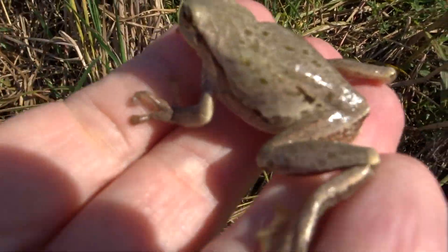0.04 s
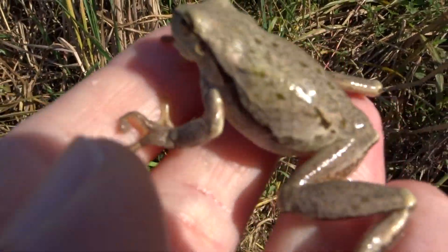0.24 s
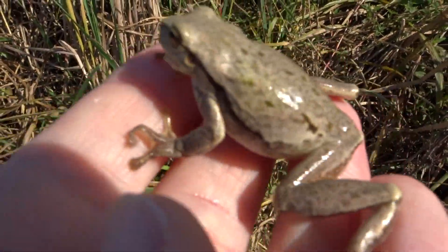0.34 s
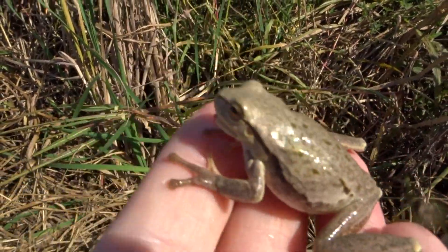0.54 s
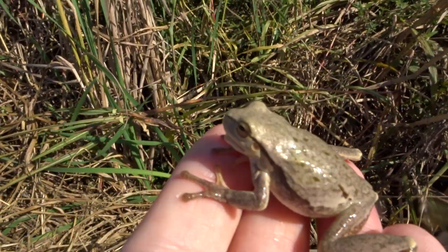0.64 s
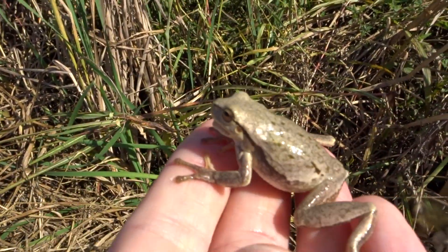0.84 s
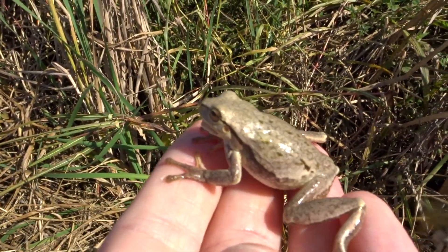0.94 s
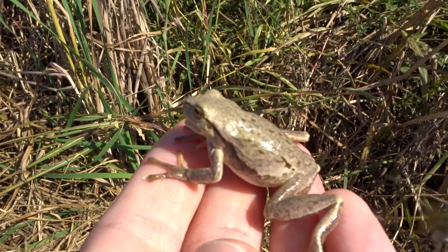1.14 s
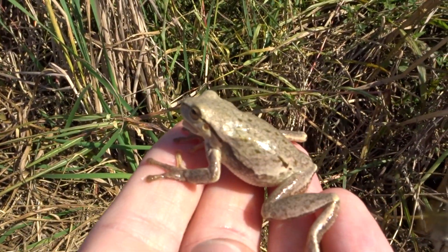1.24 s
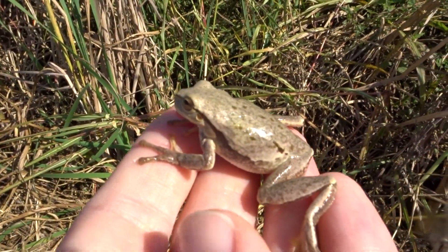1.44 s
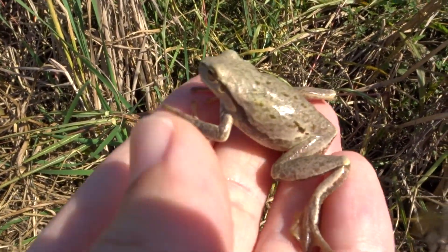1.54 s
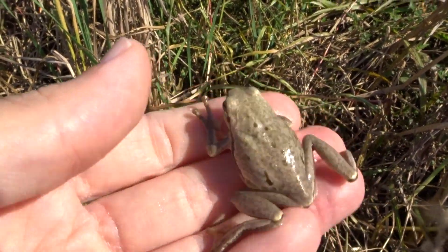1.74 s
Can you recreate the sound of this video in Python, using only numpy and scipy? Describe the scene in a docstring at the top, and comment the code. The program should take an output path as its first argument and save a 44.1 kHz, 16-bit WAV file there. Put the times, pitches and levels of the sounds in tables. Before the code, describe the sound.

One shrill, raspy frog cry rises quickly, then wavers and falls, close by outdoors.

```python
"""A faint outdoor background and a small wet tick, then one long rasping cry from a hand-held tree frog.
Its larynx snaps out clicks that ring in the opening mouth, close to the listener: they speed up
to a scream, sag, waver and end as a rattle. A few soft handling bumps fall early in the cry,
a fine hiss swells under its second half, and one more wet tick follows it."""
import sys
import numpy as np
from scipy import signal
from scipy.fft import rfft, irfft
from scipy.io import wavfile

SR = 44100
rng = np.random.default_rng(int(sys.argv[2]) if len(sys.argv) > 2 else 0)


def generate_wav(sig):
    """Save sig (samples, or channels by samples) to the path in sys.argv[1] as 16-bit PCM at SR."""
    pcm = np.round(np.clip(np.atleast_2d(sig).T, -1, 1) * 32767).astype(np.int16)
    wavfile.write(sys.argv[1], SR, pcm)


N = 79380


def amp(db):
    """Decibels to gain."""
    return 10 ** (np.asarray(db) / 20)


def evened(x):
    """Scales to an rms of 1."""
    return x / np.sqrt(np.mean(x ** 2) + 1e-20)


def curve(points, at, axis=1):
    """Reads one column of a table along straight lines."""
    table = np.transpose(points)
    return np.interp(at, table[0], table[axis])


def colour(points, hz):
    """Reads a spectrum on a log-frequency axis."""
    f, value = np.transpose(points)
    return np.interp(np.log(hz + 1), np.log(f), value)


def add(mix, s, sound):
    """Mixes a sound in at a time."""
    part = mix[round(s * SR):][:len(sound)]
    part += sound[:len(part)]


def slow_noise(hz):
    """Low-passed noise of rms 1."""
    return evened(signal.sosfilt(signal.butter(2, hz, fs=SR, output="sos"), rng.standard_normal(N)))


def causal(db):
    """Spectra that ring after the strike, from rows of levels."""
    cepstrum = irfft(np.log(amp(db)))
    half = cepstrum.shape[-1] // 2
    cepstrum[..., 1:half] *= 2
    cepstrum[..., half + 1:] = 0
    return np.exp(rfft(cepstrum))


# Stereo image of the noise beds. Each row: frequency in Hz, likeness from 0 (wide) to 1 (mono).
LIKENESS = [(50, 1), (200, 0.9), (700, 0.58), (2000, 0.68), (6000, 0.02), (14000, 0.27)]

def noise_bed(eq):
    """Steady noise, centred in the bass and wide in the treble."""
    hz = np.fft.rfftfreq(N, 1 / SR)
    left, other = rfft(rng.standard_normal((2, N)))
    likeness = colour(LIKENESS, hz)
    right = likeness * left + np.sqrt(1 - likeness ** 2) * other
    return evened(irfft(np.array([left, right]) * amp(colour(eq, hz)), N))


# Tone of the outdoor bed. Each row: frequency in Hz, relative level in dB.
OUTDOOR_EQ = [(15, -30), (25, -3.5), (101, -2.5), (164, -8), (1080, -8), (1620, -12), (5010, -12),
              (15500, -32)]

def outdoors(level_db=-50.5):
    """A faint, even wash of outdoor noise."""
    return amp(level_db) * noise_bed(OUTDOOR_EQ)


# Tone of the hiss. Each row: frequency in Hz, relative level in dB.
HISS_EQ = [(800, -13.5), (2500, 1), (5000, 1), (9000, -0.5), (11000, -4), (15500, -5)]
# Its fader ride. Each row: time in seconds, level in dB.
HISS_FADER = [(0, -60), (.18, -56.5), (.3, -66), (.8, -45.5), (1.3, -41), (1.4, -45.5), (1.6, -46),
              (1.8, -51.5)]

def hiss():
    """Fine hiss, a touch to the right, that peaks as the cry ends."""
    fader = amp(curve(HISS_FADER, np.arange(N) / SR))
    return fader * noise_bed(HISS_EQ) * amp([[-.5], [.5]])


# Each row: start in seconds, length in seconds, whistle pitch in Hz, whistle and knock levels in dB.
WET_TICKS = [(0.101, 0.028, 3406, -35.5, -29), (1.6203, 0.0072, 3580, -29, -35.5)]

def wet_ticks(sag=.15, rise_s=.00061, knock_hz=1780, knock_t60=.02):
    """Each tick is a short knock and a tiny falling whistle."""
    out = np.zeros(N)
    for start, length, hz, whistle_db, knock_db in WET_TICKS:
        t = np.arange(0, length, 1 / SR)
        cycles = np.cumsum(hz * (1 - sag * t / length)) / SR
        whistle = np.minimum(t / rise_s, 1) * np.sqrt(1 - t / length) * np.sin(2 * np.pi * cycles)
        knock = np.exp(-np.log(1000) * t / knock_t60) * np.sin(2 * np.pi * knock_hz * t)
        add(out, start, amp(whistle_db) * whistle + amp(knock_db) * knock)
    return out


# Pitch line of the cry. Each row: time in seconds, click rate in Hz.
CLICK_RATE = [(.195, 348), (.201, 830), (.207, 1071), (.217, 924), (.227, 1019), (.235, 1369), (.251, 1818),
              (.273, 2080), (.305, 2044), (.329, 2087), (.353, 2158), (.379, 2075), (.419, 2065),
              (.469, 1955), (.489, 1936), (.517, 1949), (.551, 1917), (.577, 1955), (.593, 1894),
              (.615, 1911), (.639, 1803), (.665, 1840), (.695, 1758), (.721, 1775), (.737, 1644),
              (.765, 1615), (.773, 1471), (.785, 1559), (.792, 1494), (.802, 1587), (.821, 1636),
              (.833, 1536), (.844, 1579), (.856, 1481), (.866, 1464), (.875, 1358), (.883, 1147),
              (.891, 1386), (.901, 1219), (.909, 1429), (.921, 1310), (.933, 1332), (.941, 1170),
              (.961, 1240), (.969, 1395), (.979, 1426), (.989, 1296), (1.001, 1345), (1.012, 1258),
              (1.019, 1346), (1.045, 1332), (1.051, 1171), (1.057, 1282), (1.063, 1288), (1.089, 1027),
              (1.103, 1079), (1.139, 792.4), (1.149, 950), (1.171, 906), (1.179, 804), (1.209, 934),
              (1.225, 842.7), (1.235, 716.7), (1.253, 682.7), (1.267, 773.3), (1.279, 662.6),
              (1.299, 384.7), (1.314, 182.4), (1.325, 95.5), (1.3413, 25.47)]
# Rasp in the voice. Each row: time in seconds, roughness from 0 to 1.
RASP = [(.2, 0.4), (.26, 0.48), (.29, 0.02), (.45, 0.12), (.8, 0.12), (.88, 0.33), (1.1, 0.5), (1.3, 0.3)]

def larynx(quiver=.004, rasp_quiver=.016, quiver_hz=85):
    """Click times, one per cycle of the larynx; the pitch quivers more where the voice rasps."""
    t = np.arange(CLICK_RATE[0][0], CLICK_RATE[-1][0], 1 / SR)
    wobble = (quiver + rasp_quiver * curve(RASP, t)) * slow_noise(quiver_hz)[:len(t)]
    cycles = np.cumsum(curve(CLICK_RATE, t) * (1 + wobble)) / SR
    # The last click lands right at the end of the pitch line.
    return np.interp(np.arange(cycles[-1] % 1, cycles[-1] + .5), cycles, t)


# Force behind the clicks. Each row: time in seconds, gain in dB.
CLICK_FORCE = [(.195, -13), (.1995, -24), (.201, -5), (.206, 2.5), (.238, 2.5), (.253, 1), (.268, 1),
               (.3, 0.5), (.355, 3), (.4, 0.5), (.47, 1), (.7, 0), (.745, -1.5), (.79, 0), (.85, -1),
               (1.0, 0), (1.28, -1), (1.315, -2), (1.342, -4.5)]
# Steady colour of the throat. Each row: frequency in Hz, gain in dB.
THROAT_EQ = [(500, -60), (900, -45), (1300, -27), (1600, -23.5), (1980, -10), (2400, -13), (2900, -7),
             (4000, -6), (4600, -12), (5600, -9), (6400, -12.5), (7500, -12), (10500, -12), (12200, -11),
             (13500, -15), (15000, -24), (16000, -38)]
# Sweep of the mouth's main resonance. Each row: time in seconds, centre in Hz.
MOUTH_SWEEP = [(.2, 3760), (.207, 6400), (.215, 7900), (.235, 7820), (.247, 6850), (.268, 8040),
               (.295, 9470), (.325, 8600), (.353, 9060), (.372, 9720), (.41, 9650), (.435, 9040),
               (.48, 9350), (.6, 9040), (.7, 9050), (.85, 9320), (1.34, 9700)]
# Shape of that peak. Each row: frequency as a multiple of the centre, gain in dB.
MOUTH_PEAK = [(.6, -0.5), (.72, 3), (.81, 6), (.9, 14.5), (1.0, 19.5), (1.06, 14.5), (1.12, 3.5),
              (1.25, -1)]
# A high shelf that makes the top flicker. Each row: time in seconds, gain in dB.
TREBLE_SHELF = [(.2, -24), (.22, -3), (.25, -2.5), (.29, 8.5), (.34, -1.5), (.38, 8.5), (.435, 4.5),
                (.47, 4.5), (.54, 0.5), (.6, 8), (.66, 2), (.8, 0), (1.1, -3), (1.3, -4.5)]
# Stereo image of the cry. Each row: frequency in Hz, left over right in dB, left lead in radians.
CRY_IMAGE = [(1520, -0.5, 0.5), (3030, -2, -0.48), (4700, -1.5, -0.7), (5370, 5, 0.66), (7800, 6, 0.56),
             (8000, 3.5, -0.5), (9350, 0.5, -0.9), (10050, -14.5, -2.2), (10300, -14, 1.07),
             (11340, 16.5, 1), (12570, 2.5, -1.15), (14700, -2.5, 0.8)]
# The cry's bright peak drifts between left and right.
# Each row: time in seconds, extra left over right in dB.
PEAK_PAN = [(.2, -7.5), (.33, 4.5), (.42, 10), (.48, -7), (.6, -10), (.68, -1), (.8, -0.5), (1.3, 2.5)]

def frog_cry(jitter_s=1e-5, shimmer_db=1, breath_db=-12, shelf_hz=(8830, 10500)):
    """Each larynx click rings the throat and moving mouth; rasp adds unevenness and a rush of air."""
    size, lead_in = 256, 24  # samples
    times, hz = larynx(), np.fft.rfftfreq(size, 1 / SR)
    chance = rng.standard_normal((N // lead_in, 2 + 2 * len(hz)))[:len(times)]
    rasp = curve(RASP, times)
    times = times + jitter_s * rasp * chance[:, 0]
    force_db = curve(CLICK_FORCE, times) + shimmer_db * rasp * chance[:, 1]
    mouth_db = curve(MOUTH_PEAK, hz / curve(MOUTH_SWEEP, times)[:, None])
    shelf_db = curve(TREBLE_SHELF, times)[:, None] * np.interp(hz, shelf_hz, [0, 1])
    clicks = causal(colour(THROAT_EQ, hz) + mouth_db + shelf_db + force_db[:, None])
    real, imaginary = np.split(chance[:, 2:], 2, axis=1)
    clicks *= 1 + amp(breath_db) * rasp[:, None] * (real + 1j * imaginary)
    # A phase ramp places each click between samples, keeping the scream's pitch clean.
    starts = (times * SR).astype(int) - lead_in
    clicks *= np.exp(-2j * np.pi * hz * (times - starts / SR)[:, None])
    slots = (starts[:, None] + np.arange(size)).ravel()
    drift_db = curve(PEAK_PAN, times)[:, None] * mouth_db / mouth_db.max()
    balance_db = curve(CRY_IMAGE, hz) + drift_db
    left_lead = curve(CRY_IMAGE, hz, axis=2)
    channels = []
    for side in (1, -1):  # left, right
        pan = np.sqrt(2 / (1 + amp(-side * balance_db) ** 2))
        grains = irfft(clicks * pan * np.exp(.5j * side * left_lead))
        channels.append(np.bincount(slots, grains.ravel(), N)[:N])
    return np.array(channels)


# Finger nudges. Each row: start in seconds, gain in dB, tilt of the ring in dB per octave.
NUDGES = [(.2693, -37, 5), (.2728, -30.5, -0.5), (.3485, -46.5, 5)]
# Modes of the camera body. Each row: frequency in Hz, relative level in dB.
BODY_MODES = [(150, -4), (400, 3.5), (640, -4), (850, -7.5), (980, 0), (3000, -16)]

def handling_bumps(rise_s=.0012, t60=.039, thud_db=-6, thud_hz=1240, pivot_hz=400):
    """Fingers nudge the camera: a dull thud with a brief ring, slightly to the right."""
    out, t = np.zeros(N), np.arange(2500) / SR
    envelope = np.minimum(t / rise_s, 1) * np.exp(-np.log(1000) * np.maximum(t - rise_s, 0) / t60)
    for start, gain_db, tilt_db in NUDGES:
        ring = sum(amp(db + tilt_db * np.log2(hz / pivot_hz)) * np.sin(2 * np.pi * hz * t)
                   for hz, db in BODY_MODES)
        thud = amp(thud_db) * slow_noise(thud_hz)[:len(t)]
        add(out, start, amp(gain_db) * envelope * (ring + thud))
    return out * amp([[-1.5], [1.5]])


def reflections(x, level_db=-21, t60=.12):
    """Nearby things scatter back a faint, short tail."""
    t = np.arange(8000) / SR
    tail = rng.standard_normal((2, len(t))) * np.exp(-np.log(1000) * t / t60)
    return amp(level_db) * signal.fftconvolve(x, tail / np.linalg.norm(tail[0]), axes=1)[:, :N]


def scene():
    """The close sounds and their short tail, over the two noise beds."""
    close = wet_ticks() + frog_cry() + handling_bumps()
    return close + hiss() + reflections(close) + outdoors()


def record(dry, cutoff_hz=15850):
    """A steep low-pass trims the very top of the mix."""
    lowpass = signal.firwin(511, cutoff_hz, window=("kaiser", 9), fs=SR)
    return signal.oaconvolve(dry, lowpass[None], "same")


dry = scene()
out = record(dry)
generate_wav(out)
```